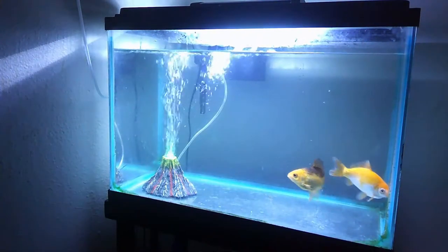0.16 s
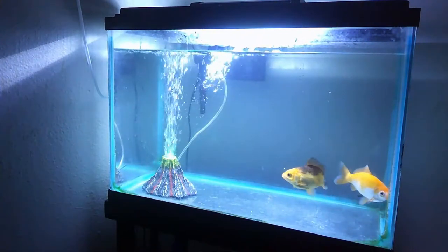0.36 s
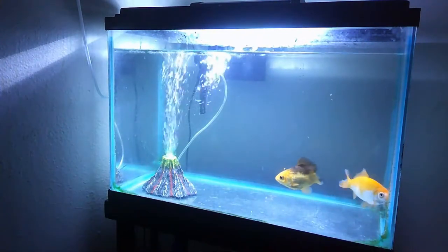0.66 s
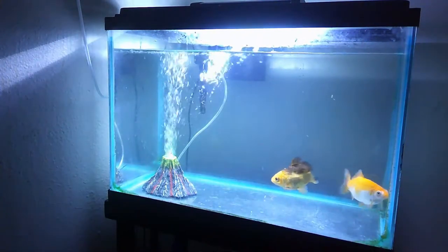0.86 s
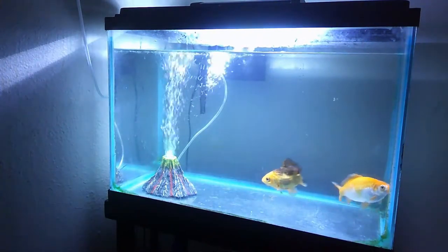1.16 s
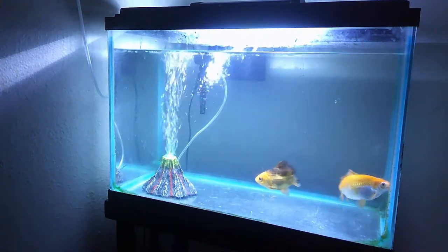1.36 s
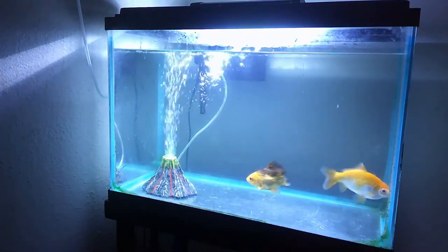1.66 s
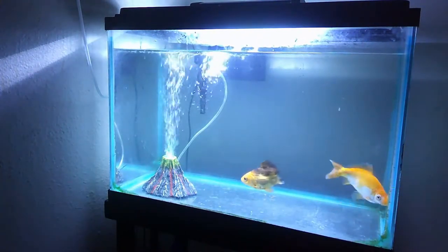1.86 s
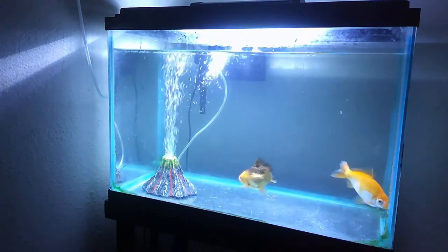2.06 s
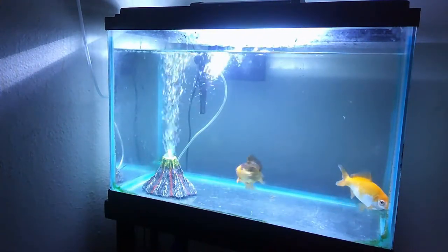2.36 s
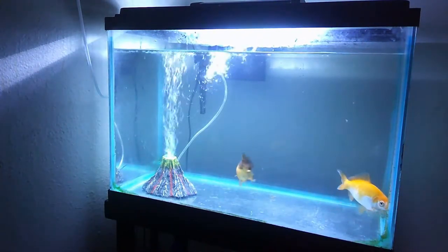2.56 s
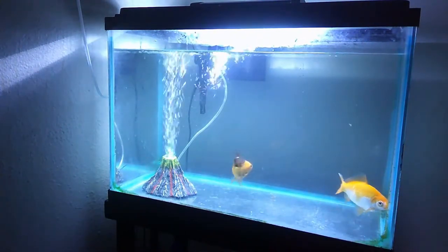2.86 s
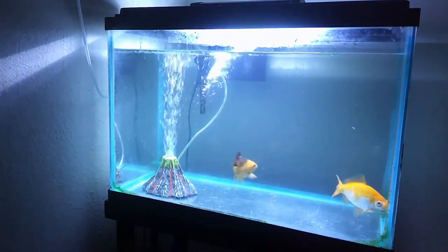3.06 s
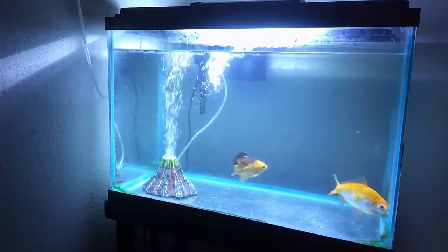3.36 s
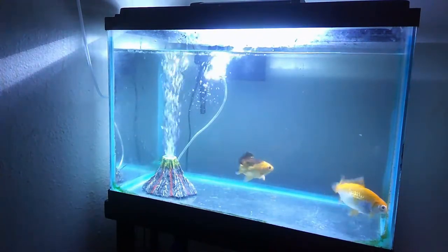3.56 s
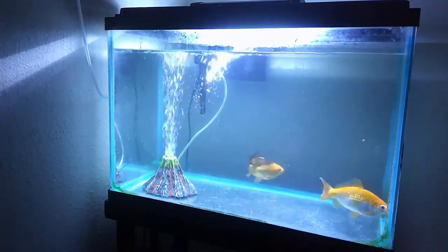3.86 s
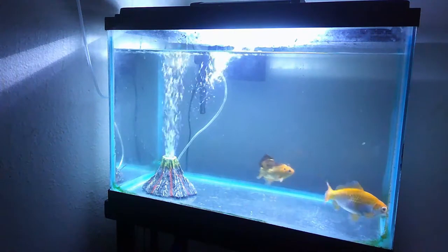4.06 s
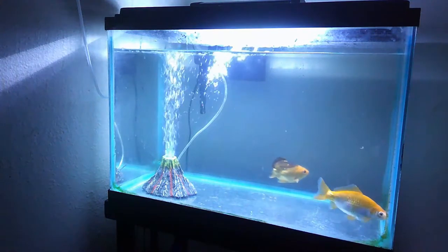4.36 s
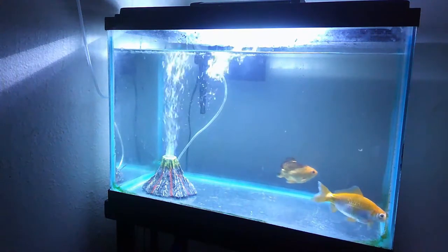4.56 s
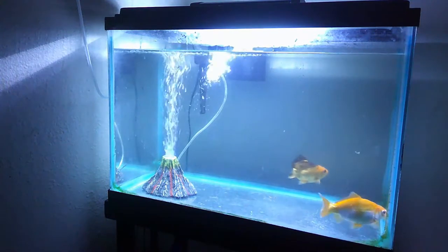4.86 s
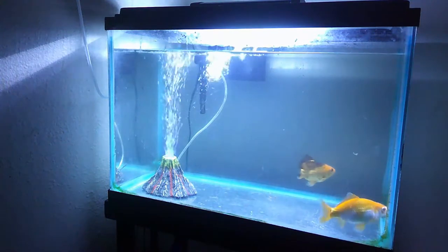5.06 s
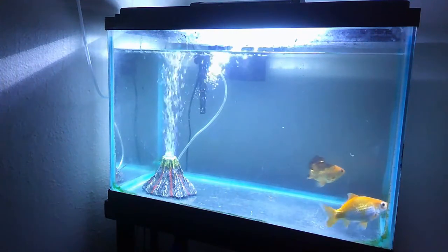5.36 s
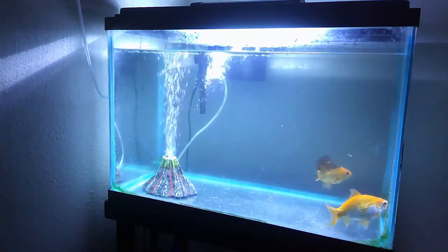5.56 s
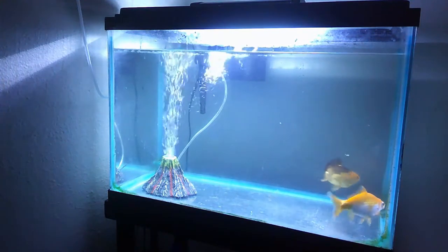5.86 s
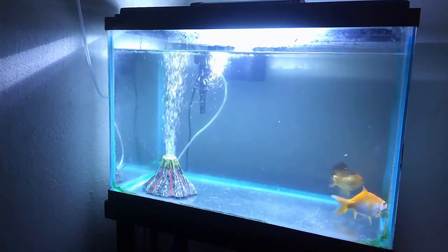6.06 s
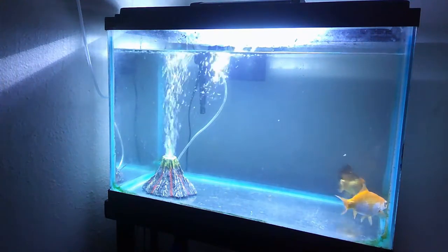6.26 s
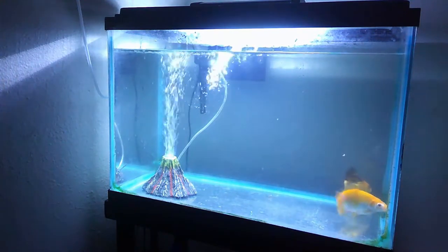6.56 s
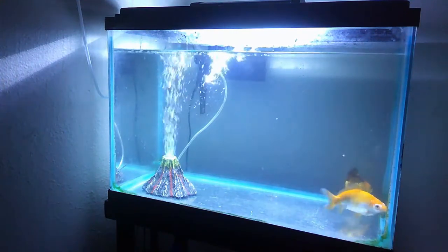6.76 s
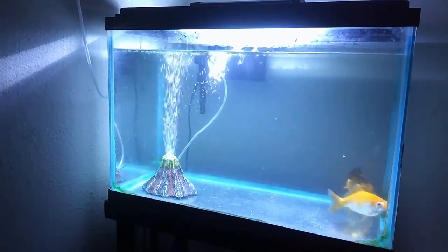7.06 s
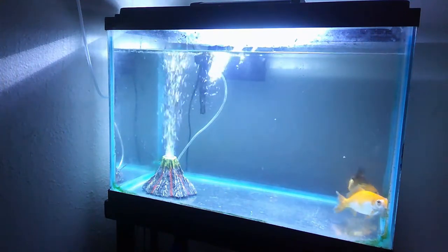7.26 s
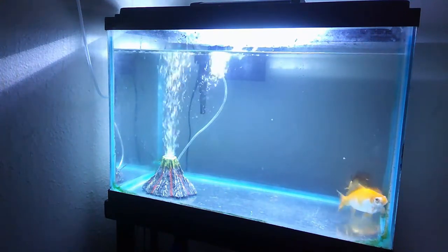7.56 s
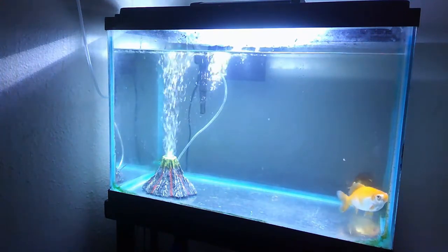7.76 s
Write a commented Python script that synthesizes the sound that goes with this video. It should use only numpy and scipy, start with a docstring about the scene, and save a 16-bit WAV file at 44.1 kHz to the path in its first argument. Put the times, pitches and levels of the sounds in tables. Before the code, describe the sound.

In a small room, bubbles burst at the top of a fish tank. A few light clicks come first, then a dense cluster of plops and rattles after three seconds, a lull, short groups near five seconds, and a busy run from six and a half. Fine froth simmers beneath, with a faint pump hum and low rumble. The microphone is fairly close, with a slightly dull top end.

```python
"""In a small room, air bubbles rise in a fish tank and burst under its hood, singly and in flurries.
Each burst is a run of clicks that rattles between water, glass and hood, with a fizz of spray.
Some bubbles and bursts ring briefly in sinking, wavering tones, many near 1 kHz; froth is a crowd of tiny ones.
The air pump hums underneath as a few sine tones. Filtered noise gives room rumble, hiss and a faint whistle,
and a deep sine shudder dies away."""
import sys
import numpy as np
from scipy import signal
from scipy.fft import rfft, irfft, next_fast_len
from scipy.io import wavfile

SR = 44100
rng = np.random.default_rng(int(sys.argv[2]) if len(sys.argv) > 2 else 0)


def generate_wav(sig):
    """Save sig (samples, or channels by samples) to the path in sys.argv[1] as 16-bit PCM at SR."""
    pcm = np.round(np.clip(np.atleast_2d(sig).T, -1, 1) * 32767).astype(np.int16)
    wavfile.write(sys.argv[1], SR, pcm)


N = 348213  # length in samples
TIME = np.arange(N) / SR  # seconds

# Steady room noise. Each row: frequency in Hz, relative level in dB.
ROOM_NOISE = [(8, 8.5), (25, 3), (55, 3), (80, -3), (160, -8.5), (300, -13.5), (650, -19.5), (1050, -21),
              (1700, -27.5), (3100, -30.5), (4000, -41.5), (4800, -54), (5800, -42.5), (7200, -44),
              (8400, -56)]
# Pump and motor tones. Each row: frequency in Hz, rms level in dB.
HUM_TONES = [(48.7, -65), (60, -43), (120, -64), (180, -60.5)]
# Swells of a faint whistle. Each row: time of the top in seconds, rms level in dB added over the rest level.
WHISTLE_SWELLS = [(1.99, -74), (2.075, -69), (4.165, -69), (4.267, -75), (4.355, -71), (5.6, -70),
                  (5.685, -66)]
# Rise and fall of the froth. Each row: time in seconds, relative level in dB.
FROTH_LEVEL = [(0, -13), (2.7, -3.5), (3.8, -7), (5.1, 0.5), (5.9, -8.5), (6.4, -2), (7.35, 6.5),
               (7.9, -2.5)]
# Broad colour of a burst under the hood. Each row: frequency in Hz, level in dB.
HOOD_COLOUR = [(80, -10), (160, 0), (350, -9.5), (680, -9.5), (1000, -7), (1300, -6.5), (1650, -18),
               (2150, -9.5), (2600, -10), (3300, -11), (4000, -19.5), (4800, -31.5), (5800, -20),
               (7100, -20), (8400, -39)]
# Resonances of the air space under the hood. Each row: frequency in Hz, width in Hz, lift in dB.
HOOD_RESONANCES = [(828, 3.1, 6.5), (974, 49, 3.5), (1007, 300, 9), (2255, 67, 2.5)]
# Borders between thud, plop, crack and fizz, as a list of frequencies in Hz.
REGISTER_EDGES_HZ = [700, 1500, 4500]
# Short rings of bubbles and bursts; a strong burst may have several rows, one for each of its tones.
# Each row: start in seconds, middle pitch in Hz, level in dB, time to fall by 60 dB (t60) in seconds.
SHORT_RINGS = [(0.698, 1014, -48, 0.2), (0.929, 1055, -47, 0.28), (1.482, 2980, -34, 0.03),
               (1.491, 2360, -40, 0.043), (1.505, 1052, -46, 0.24), (1.6495, 2800, -31.5, 0.049),
               (1.654, 1030, -38.5, 0.067), (1.656, 650, -41.5, 0.054), (2.797, 1096, -48.5, 0.39),
               (2.962, 573, -34.5, 0.056), (2.961, 1170, -38, 0.06), (2.963, 1590, -35, 0.038),
               (3.059, 1290, -40, 0.023), (3.353, 390, -36, 0.018), (3.36, 2770, -39, 0.018),
               (3.4315, 3510, -36.5, .025), (3.432, 1046, -38, 0.066), (3.452, 2560, -31, 0.058),
               (3.454, 828, -31.5, 0.061), (3.61, 3070, -45.5, 0.017), (3.806, 1015, -30.5, 0.045),
               (3.82, 170, -26, 0.021), (4.323, 1047, -51, 0.22), (4.35, 992, -53, 0.2),
               (4.39, 895, -56, 0.16), (4.437, 1186, -52, 0.27), (4.9117, 3080, -32, 0.014),
               (4.912, 1049, -38.5, 0.075), (4.982, 1018, -44, 0.1), (5.251, 1312, -39.5, 0.059),
               (5.259, 2920, -35, 0.019), (5.26, 1002, -40.5, 0.065), (6.424, 3470, -43, 0.025),
               (6.455, 1028, -39, 0.051), (6.529, 1053, -34, 0.063), (6.641, 1000, -31.5, 0.051),
               (6.716, 887, -36, 0.044), (6.742, 1010, -38.5, 0.16), (6.941, 1006, -35, 0.038),
               (7.047, 980, -36.5, 0.092), (7.183, 844, -39.5, 0.043), (7.1872, 2480, -34, 0.021),
               (7.316, 950, -40.5, 0.13), (7.569, 1312, -53.5, 0.34), (7.735, 1150, -50.5, 0.14)]
# Bursting bubbles. Each row: start in seconds, level in dB, crack over plop in dB,
# fizz of spray relative to the level in dB.
BURSTING_BUBBLES = [(0.749, -58, 1, -33), (1.154, -59, 5, -12.5), (1.29, -54.5, -4, -22),
                    (1.3501, -48.5, -0.5, -40), (1.481, -46, 15, -22), (1.511, -54, 5, -31),
                    (1.65, -42.5, 2, -30), (1.673, -50.5, -5, -33), (2.525, -60, 14, -24),
                    (2.711, -57, -15, -31), (2.93, -48.5, 5, -22.5), (2.962, -44.5, -10.5, -45),
                    (3.059, -57, -7, -42), (3.117, -49, -1.5, -28), (3.3531, -43, -2, -25),
                    (3.396, -43.5, -10, -40), (3.431, -42, 3, -17.5), (3.452, -38, 5, -23),
                    (3.47, -40, -15, -28), (3.506, -42, -7, -34), (3.544, -60, 8, -33.5),
                    (3.609, -52.5, -4.5, -26), (3.744, -49, -2.5, -26), (3.806, -41, 0.5, -26),
                    (3.816, -38.5, -3, -20), (3.963, -51, -12, -47), (4.894, -51.5, -3, -16),
                    (4.9122, -45.5, 7, -10), (4.931, -46, 15, -17), (5.052, -57.5, -8, -16),
                    (5.135, -55.5, -12, -40), (5.207, -55, -8, -35), (5.22, -46, -5.5, -25),
                    (5.257, -42.5, -0.5, -20), (5.277, -50, -4, -18), (6.265, -48.5, -6.5, -27),
                    (6.352, -57, 3, -12.5), (6.404, -52.5, -2, -39), (6.424, -56, 1, -33),
                    (6.454, -45, 1, -15.5), (6.53, -44, -4.5, -44), (6.55, -54.5, 13, -28),
                    (6.563, -50.5, -10, -19), (6.596, -49.5, -1.5, -26), (6.613, -49.5, -7, -27),
                    (6.64, -45.5, 0, -27), (6.673, -51, 17, -28), (6.696, -46, -13, -49),
                    (6.718, -43, -4.5, -45), (6.74, -50, -3.5, -43), (6.872, -50, -5.5, -42),
                    (6.891, -47.5, -5.5, -40), (6.933, -42.5, -5, -29), (6.943, -42, -8, -32),
                    (6.959, -46, -1, -33), (7.047, -45, 5, -25), (7.07, -50, 13, -23),
                    (7.119, -45, 3.5, -19.5), (7.146, -45.5, -8.5, -24), (7.167, -49.5, 0.5, -27),
                    (7.182, -40.5, 1, -23.5), (7.311, -46, -7, -28), (7.48, -52, -4, -34),
                    (7.555, -50.5, -12, -44)]
# Rafts of foam that give way in a soft flurry. Each row: start in seconds, level in dB.
FOAM_FLURRIES = [(4.322, -55.5), (5.106, -49.5), (5.565, -46.5), (6.745, -49), (7.197, -47.5),
                 (7.302, -49.5), (7.425, -46), (7.485, -53.5)]

SHUDDER_DB, SHUDDER_FADE_DB_PER_S = -34, 12.5  # rms level at the start, and how fast it dies away
WHISTLE_SWELL_S, WHISTLE_REST_DB = 0.035, -78.5  # half width of a swell; rms level between swells
RISE_SHARE = 0.025  # a ring swells over this share of its t60, so the long ones start softly
PITCH_SAG, SAG_TIME = 0.08, 0.15  # a ring sinks by this share of its pitch, over this share of its t60
TYPICAL_DB = -46  # level of a typical burst
THUD_DB, THUD_GROWTH = -6.5, 0.39  # typical thud relative to its burst; extra dB for each dB of strength
RATTLE_T60_S, DOUBLING_DB = 0.081, 16  # typical rattle; twice as long for a burst this much louder
SWELL_S = 0.00098  # time that a film takes to tear
FIRST_CLICK_DB = -8  # the first rip of a film, relative to the rattle that follows
COLLAPSE_S, COLLAPSE_DB = 0.0065, -5.5  # delay and level of the second snap, as the hollow closes
SPRAY_SWELL_S, SPRAY_T60_S = 0.0034, 0.095  # droplets land just after a burst
FLURRY_S, FLURRY_T60_S = 0.04, 0.08  # length of a flurry; rattle of each of its bursts
FLURRY_CRACK_DB, FLURRY_FIZZ_DB = -7.5, -38  # crack over plop; fizz relative to the level
CUTOFF_HZ = 8550  # top of the sound


def amp(db):
    """Turns decibels into gain."""
    return 10 ** (np.asarray(db) / 20)


def unit(x):
    """Scales a sound to rms 1."""
    return x / np.sqrt(np.mean(x ** 2) + 1e-20)


def spectrum(points, hz):
    """Reads the gain at each frequency from a table of Hz and dB, on a log-frequency axis."""
    f, db = np.transpose(points)
    return amp(np.interp(np.log(hz + 1), np.log(f + 1), db))


def curve(points):
    """Reads the gain at every sample from a table of seconds and dB."""
    return amp(np.interp(TIME, *np.transpose(points)))


def add(mix, s, sound):
    """Mixes a sound in at time s, in place."""
    part = mix[max(round(s * SR), 0):][:len(sound)]
    part += sound[:len(part)]


def drift(rate_hz):
    """Random wander of rms 1: noise that keeps little above rate_hz."""
    length = next_fast_len(N)
    hz = np.fft.rfftfreq(length, 1 / SR)
    slow = rfft(rng.standard_normal(length)) / (1 + (hz / rate_hz) ** 4)
    return unit(irfft(slow, length)[:N])


def causal(gain):
    """Turns gains into a click response that starts at once (minimum phase)."""
    both_sides = np.r_[gain, gain[-2:0:-1]]
    log_gain = np.log(np.maximum(both_sides, 1e-5))
    return np.fft.ifft(np.exp(np.conj(signal.hilbert(log_gain)))).real


def background(level_db=-48.5, shudder_hz=17):
    """Room rumble and hiss from filtered noise, with a deep sine shudder that fades."""
    length = next_fast_len(N)
    colour = spectrum(ROOM_NOISE, np.fft.rfftfreq(length, 1 / SR))
    noise = irfft(rfft(rng.standard_normal(length)) * colour, length)[:N]
    fade = amp(SHUDDER_DB - SHUDDER_FADE_DB_PER_S * TIME)
    shudder = np.sqrt(2) * fade * np.sin(2 * np.pi * shudder_hz * TIME)
    return amp(level_db) * unit(noise) + shudder


def pump(waver=0.025):
    """Mains-driven hum: steady tones whose level wavers a little."""
    hum = sum(amp(db) * np.sin(2 * np.pi * (hz * TIME + rng.random())) for hz, db in HUM_TONES)
    return np.sqrt(2) * hum * (1 + waver * drift(0.56))


def whistle(centre_hz=2788, width_hz=48):
    """A faint, broken whistle that swells now and then: noise in one narrow resonance."""
    wander = drift(width_hz) + 1j * drift(width_hz)
    tone = wander * np.exp(2j * np.pi * centre_hz * TIME)
    swells = sum(amp(db) * np.exp(-((TIME - s) / WHISTLE_SWELL_S) ** 2) for s, db in WHISTLE_SWELLS)
    return (amp(WHISTLE_REST_DB) + swells) * unit(tone.real)


def hood_colour(hz):
    """Broad colour of the air space under the hood, lifted at its resonances."""
    lift_db = sum(db / (1 + (2 * (hz - f) / width) ** 2) for f, width, db in HOOD_RESONANCES)
    return spectrum(HOOD_COLOUR, hz) * amp(lift_db)


def rattle(swell, t60, snaps_per_s=1400, spread_db=3.5, size=8192):
    """The film tears in a quick run of uneven snaps that die away between water, glass and hood."""
    t = np.arange(size) / SR
    snaps = rng.choice([-1, 1], size) * (rng.random(size) < snaps_per_s / SR)
    snaps = snaps * amp(spread_db * np.minimum(rng.exponential(1, size), 3))
    rise = 1 - np.exp(-(t + 0.0004) / max(swell, 0.0003))
    return snaps * rise * amp(-60 * t / max(t60, 0.02))


def cavities(low_hz=450, high_hz=3600, cycles=28, strength=0.8, count=6, size=2048):
    """A click and the few small air cavities that it sets ringing, each at a chance pitch."""
    t = np.arange(size) / SR
    hz = low_hz * (high_hz / low_hz) ** rng.random((count, 1))
    damping = np.log(1000) * hz / cycles  # small cavities die sooner
    rings = 2 * strength * damping / SR * np.exp(-damping * t) * np.cos(2 * np.pi * hz * t)
    response = rings.sum(0)
    response[0] += 1  # the click itself
    return response


def froth(level_db=-68, per_s=70, spread_db=4, t60=0.12, count=14, size=4096):
    """Many tiny bursts of random size, each spot on the surface with its own ring."""
    hood = causal(hood_colour(np.fft.rfftfreq(size, 1 / SR)))
    strengths = amp(spread_db * np.minimum(rng.exponential(1, N), 3))
    clicks = strengths * (rng.random(N) < per_s / SR)
    spot, out = rng.integers(0, count, N), np.zeros(N)
    for k in range(count):
        tiny_burst = signal.fftconvolve(rattle(0, t60), cavities())
        ring = unit(signal.fftconvolve(tiny_burst, hood))
        out += signal.oaconvolve(clicks * (spot == k), ring)[:N]
    return amp(level_db) * curve(FROTH_LEVEL) * unit(out)  # the curve shifts level_db


def blips(level_db, per_s, t60, low_hz, high_hz, spread_db=2.7, size=4096):
    """A crowd of small bubbles, each ringing once at a chance pitch; their level follows the froth."""
    t, out = np.arange(size) / SR, np.zeros(N)
    rise = 1 - np.exp(-t / (RISE_SHARE * t60))
    for start in np.flatnonzero(rng.random(N) < per_s / SR):
        pitch, loudness = rng.random(), min(rng.exponential(), 3)
        hz = low_hz * (high_hz / low_hz) ** pitch
        ring = np.sin(2 * np.pi * hz * t) * amp(spread_db * loudness - 60 * t / t60) * rise
        add(out, start / SR, spectrum(HOOD_COLOUR, hz) * ring)
    return amp(level_db) * curve(FROTH_LEVEL) * unit(out)


def short_rings(flutter=0.34, waver=0.017, size=8192):
    """Short rings of bubbles and bursts: tones that die away while their pitch sinks and wavers."""
    t, out = np.arange(size) / SR, np.zeros(N)
    wobble = (1 + flutter * (drift(57) + 1j * drift(110))) / np.sqrt(1 + 2 * flutter ** 2)
    bend = waver * drift(31)
    for s, hz, db, t60 in SHORT_RINGS:
        now = (round(s * SR) + np.arange(size)) % N
        sag = PITCH_SAG * (np.exp(-t / (SAG_TIME * t60)) - 0.5)
        pitch = hz * (1 + sag + bend[now])
        tone = np.exp(2j * np.pi * np.cumsum(pitch) / SR) * wobble[now]
        rise = 1 - np.exp(-t / (RISE_SHARE * t60))
        add(out, s, amp(db - 60 * t / t60) * rise * tone.real)
    return out


def hood_rings(size=4096):
    """The hood's answer to a click, in four registers: thud, plop, crack, fizz."""
    hz = np.fft.rfftfreq(size, 1 / SR)
    below = [0] + [1 / (1 + (hz / edge) ** 16) for edge in REGISTER_EDGES_HZ] + [1]
    return [causal(hood_colour(hz) * np.sqrt(abs(b - a))) for a, b in zip(below, below[1:])]


def snap(t60):
    """One clean click as the film rips, then its rattle."""
    snaps = rattle(SWELL_S, t60)
    snaps = snaps / np.linalg.norm(snaps)
    snaps[0] += amp(FIRST_CLICK_DB)
    return snaps


def burst(rings, snaps, level_db, crack_db, fizz_db, span=0.011):
    """Snaps set off thud, plop and crack; a patter of spray sets off the fizz."""
    drive = signal.fftconvolve(snaps, cavities())
    spray = rattle(SPRAY_SWELL_S, SPRAY_T60_S, snaps_per_s=1500)
    spray = np.pad(spray, (0, len(drive) - len(snaps)))
    thud = amp(THUD_DB + THUD_GROWTH * (level_db - TYPICAL_DB))
    plop = 1 / np.hypot(1, amp(crack_db))  # plop and crack share the level
    gains = thud, plop, plop * amp(crack_db), amp(fizz_db)
    drives = drive, drive, drive, spray
    sound = sum(gain * unit(signal.fftconvolve(x, ring)) for gain, x, ring in zip(gains, drives, rings))
    return amp(level_db) * sound * np.sqrt(span * SR / len(sound))  # level as an rms over span seconds


def pops():
    """A film tears sharply, then its hollow closes; the stronger the burst, the longer it rattles."""
    rings, out = hood_rings(), np.zeros(N)
    for s, level_db, crack_db, fizz_db in BURSTING_BUBBLES:
        t60 = RATTLE_T60_S * 2 ** ((level_db - TYPICAL_DB) / DOUBLING_DB)
        snaps = snap(t60)
        add(snaps, COLLAPSE_S, amp(COLLAPSE_DB) * snap(t60))
        add(out, s, burst(rings, snaps, level_db, crack_db, fizz_db))
    return out


def flurries(count=4):
    """In a raft of foam one film tears the next: a few small, dull bursts at uneven gaps share the level."""
    rings, out = hood_rings(), np.zeros(N)
    for s, level_db in FOAM_FLURRIES:
        for delay in FLURRY_S * (np.arange(count) + rng.random(count)) / count:
            sound = burst(rings, snap(FLURRY_T60_S), level_db, FLURRY_CRACK_DB, FLURRY_FIZZ_DB)
            add(out, s + delay, sound)
    return out / np.sqrt(count)


def room(x, wet_db=-10, t60=0.23, build=0.07, size=22050):
    """The short tail of a small room: noise that builds up (build in seconds) and dies away."""
    t = np.arange(size) / SR
    tail = rng.standard_normal(size) * amp(-60 * t / t60) * (1 - np.exp(-t / build))
    return x + amp(wet_db) * signal.oaconvolve(x, tail / np.linalg.norm(tail))[:N]


def scene():
    """Bursts and rings in the room, over the pump, the whistle and the background."""
    simmer = blips(level_db=-73.0, per_s=200, t60=0.02, low_hz=1390, high_hz=3715)
    gurgle = blips(level_db=-70.5, per_s=110, t60=0.07, low_hz=820, high_hz=1347)
    water = froth() + simmer + gurgle + short_rings() + pops() + flurries()
    return (room(water) + pump() + whistle() + background())[None]


def record(dry):
    """Limits the band: a steep low-pass filter takes away what lies above the cutoff."""
    low_pass = signal.firwin(401, CUTOFF_HZ, window=("kaiser", 8), fs=SR)
    return signal.oaconvolve(dry, low_pass[None], "same")


dry = scene()
out = record(dry)
generate_wav(out)
```